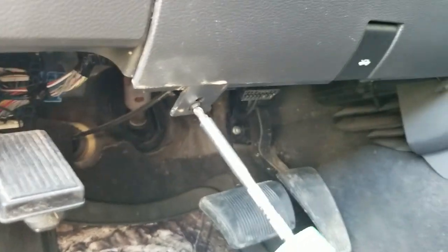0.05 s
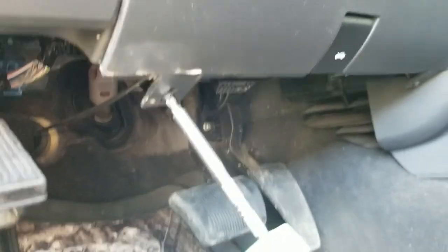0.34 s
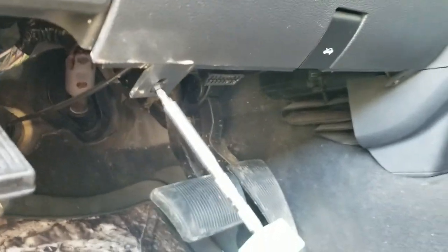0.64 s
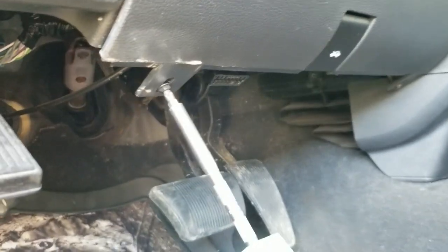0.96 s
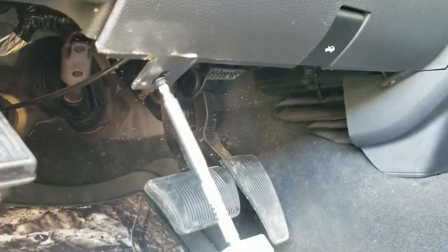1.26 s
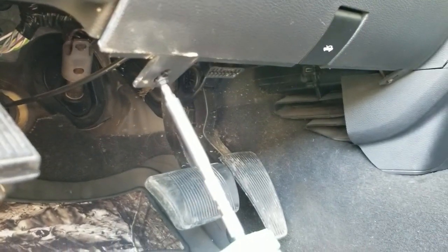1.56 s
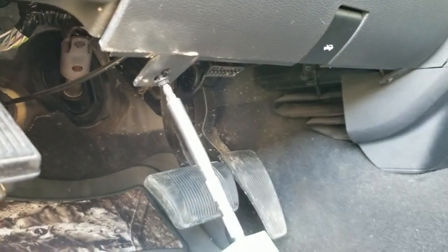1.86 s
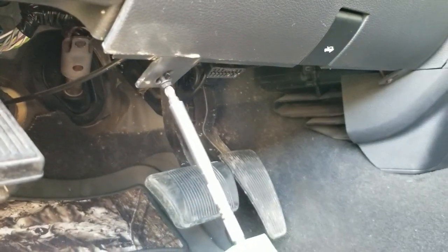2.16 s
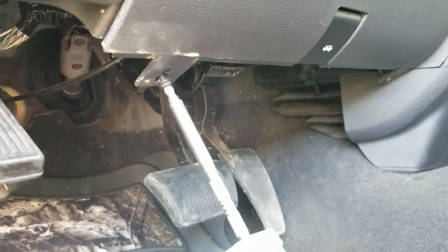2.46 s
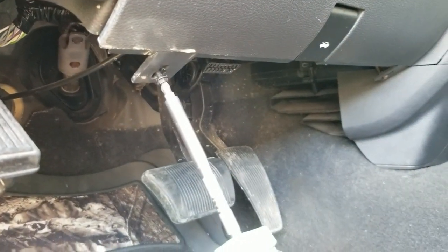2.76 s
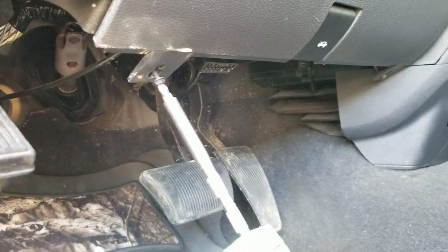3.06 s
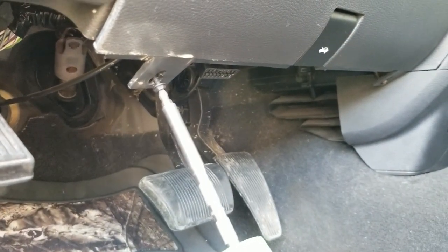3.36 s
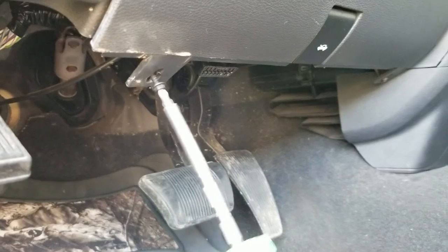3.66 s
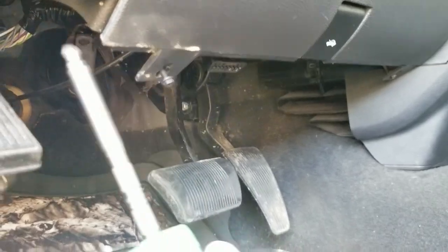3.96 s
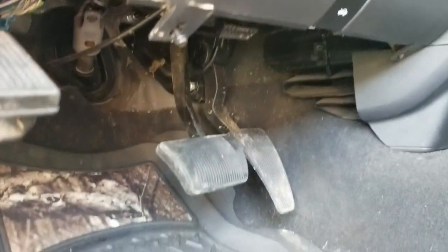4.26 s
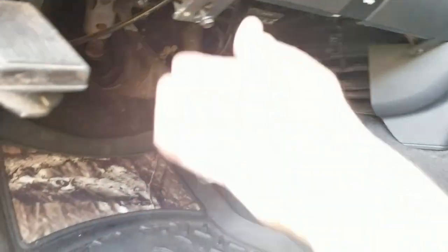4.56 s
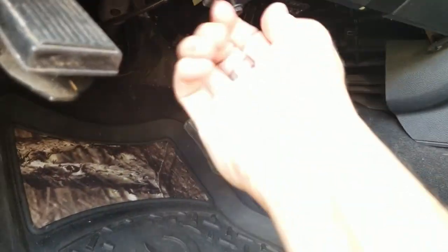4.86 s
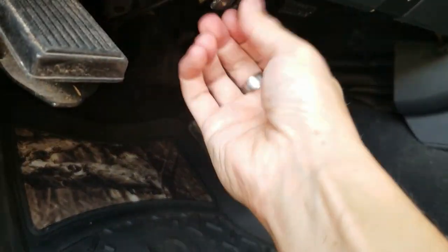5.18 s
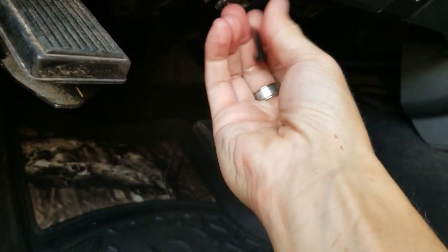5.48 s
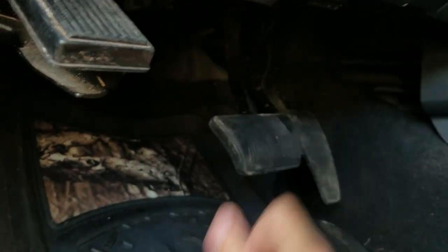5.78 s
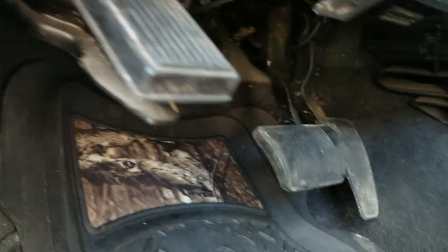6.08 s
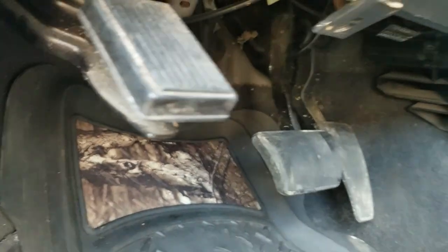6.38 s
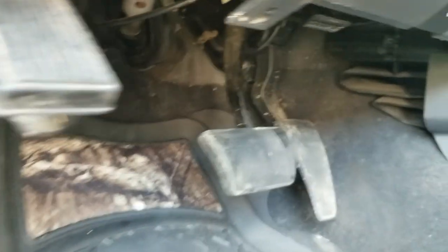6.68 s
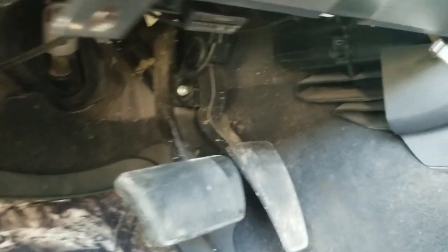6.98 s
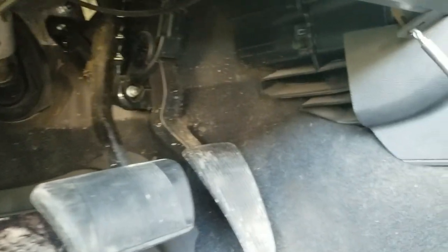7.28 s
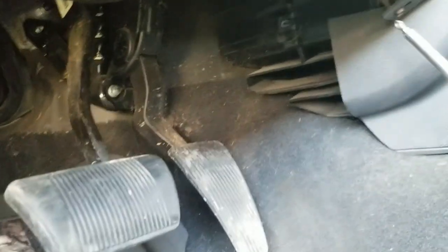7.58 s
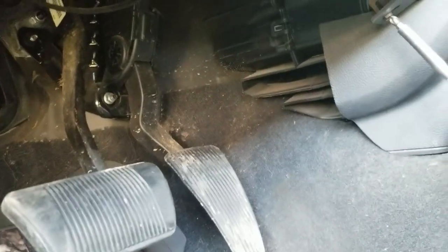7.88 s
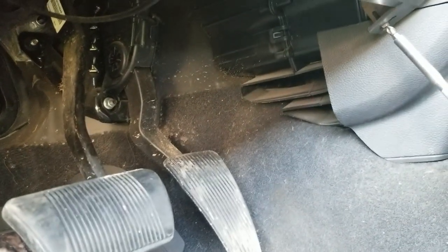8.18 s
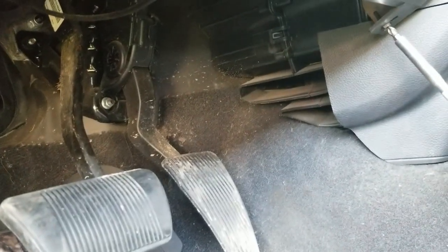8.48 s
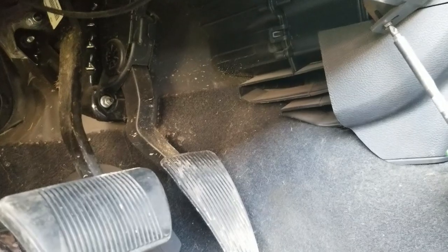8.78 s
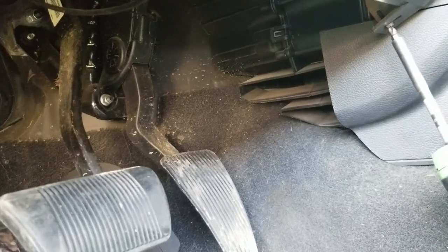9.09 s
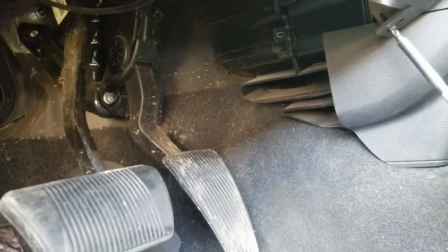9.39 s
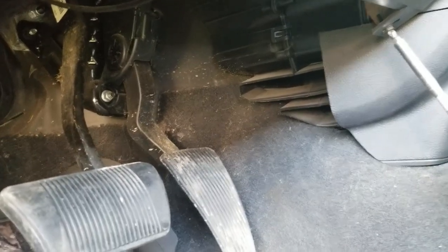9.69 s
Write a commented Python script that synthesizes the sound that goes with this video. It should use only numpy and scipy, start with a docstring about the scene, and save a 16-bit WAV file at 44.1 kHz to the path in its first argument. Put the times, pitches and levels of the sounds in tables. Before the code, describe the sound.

A small ratchet driver clicks and knocks against screws in a plastic car panel, with finger rubbing over a low hum.

```python
"""Ratchet driver in a car footwell

A small ratchet driver backs screws out of a plastic trim panel, close by, over a low cabin hum.
The pawl rattles over its teeth on each back-swing; the bit knocks and skitters on screw heads
and the panel thuds in its modes. Fingers rub as they spin the shaft; one freed screw pings."""
import sys
import numpy as np
from scipy import signal
from scipy.fft import rfft, irfft, next_fast_len
from scipy.io import wavfile
from scipy.ndimage import map_coordinates

SR = 44100
rng = np.random.default_rng(int(sys.argv[2]) if len(sys.argv) > 2 else 0)


def wav_record(signal):
    """Record a signal, one row per channel, as 16-bit PCM in the file named by sys.argv[1]."""
    frames = np.transpose(np.atleast_2d(signal))
    bounded = np.clip(frames, -1, 1)
    # unit amplitude maps onto the largest positive 16-bit level
    quanta = np.round(bounded * 32767).astype(np.int16)
    wavfile.write(sys.argv[1], SR, quanta)


N = 433944
RING_SAMPLES, TOP_HZ = 4096, 15900

# Level curves. Each row: time in seconds, level in dB.
HUM_CURVE_DB = [(0.0, -47), (0.87, -47), (1.31, -50), (3.23, -49.5), (4.85, -54), (7.48, -49.5),
                (7.97, -52.5), (9.21, -43.5), (9.84, -44)]
GRIP_CURVE_DB = [(0, -52), (1, -57), (1.3, -61), (2.3, -56.5), (2.6, -65.5), (3.25, -61.5), (3.72, -54.5),
                 (4.3, -62), (4.8, -58.5), (5, -66.5), (5.31, -53), (5.6, -71.5), (6.7, -63.5), (7, -54.5),
                 (7.2, -70), (8.2, -73), (9.35, -75), (9.84, -45.5)]
PALM_CURVE_DB = [(0, -52), (.57, -62.5), (.96, -54.5), (1.25, -64.5), (1.6, -58.5), (3.05, -60.5),
                 (3.45, -53.5), (3.75, -52), (4, -63), (4.5, -70.5), (6.3, -71), (6.52, -49.5), (6.82, -54),
                 (6.95, -63.5), (7.45, -55.5), (7.9, -74.5), (9.1, -66.5), (9.84, -55)]

# Spectra. Each row: frequency in Hz, level in dB.
HUM_SPECTRUM_DB = [(15, -71), (25, -37), (32, -29), (40, -12), (56, 2), (91, 1.5), (108, 0.5), (129, -6),
                   (162, -8), (221, -12.5), (281, -18), (335, -21), (379, -31), (500, -28), (650, -37),
                   (1100, -120)]
HISS_SPECTRUM_DB = [(300, -6), (1000, 1), (2800, -6), (5000, 5), (7000, 9.5), (9500, -2), (12500, -14),
                    (16000, -3)]
GRIP_SPECTRUM_DB = [(100, -22), (300, 8), (800, 12), (1500, 9), (3000, 3.5), (7000, 3), (9000, -18)]
SKIN_SPECTRUM_DB = [(300, -43), (2000, -17), (5000, -16), (7000, -1.5), (8800, -19), (10500, -8.5),
                    (12300, 0.5), (14000, -6), (16000, -13.5)]
BRUSH_SPECTRUM_DB = [(1470, -70), (2500, -38), (2640, -21), (3920, -8), (6250, 1.5), (9150, -16.5),
                     (12500, -9.5), (16000, -9)]
TRIM_SPECTRUM_DB = [(100, 5.5), (400, 4), (900, 5.5), (1300, 5), (2100, 3), (3200, 4), (5000, -1.5),
                    (6900, 8), (8700, -7), (11500, 11.5), (13000, 11.5), (16000, -4.5)]
RASP_SPECTRUM_DB = [(200, -11), (400, -3.5), (1200, -6), (1900, 2), (3000, -6.5), (6500, 2.5), (8500, -13),
                    (12000, -3.5), (16000, -16.5)]
CLICK_SPECTRUM_DB = [(150, -7.5), (400, -10.5), (1200, -13.5), (1900, -5), (3000, -5), (5000, 3), (6800, 9),
                     (8500, -6), (10000, -0.5), (11500, 10.5), (13000, 9.5), (16000, -1.5)]

# Modes. Each row: frequency in Hz, level in dB, T60 in seconds.
FLEX_MODES = [(58.6, -2, 0.21), (84, -6, 0.25), (103.5, 0.5, 0.34), (128, -4, 0.19), (166.3, -1, 0.19)]  # panel bending
SHELL_MODES = [(211, -0.5, 0.17), (266.4, -8.5, 0.25), (332.5, -4.5, 0.084), (388, -1.5, 0.11),
               (462.4, -2.5, 0.094), (700, -16, 0.1), (803, -5.5, 0.068), (1200, -13, 0.048)]  # panel as a hollow shell
BRACKET_MODES = [(932, -5, 0.059), (1233, -15, 0.15), (1740, -13, 0.098), (2154, -5.5, 0.062),
                 (2610, -0.5, 0.02), (3186, -35.5, 0.081), (3520, -1.5, 0.048), (4950, 3, 0.016),
                 (6586, -4.5, 0.049)]
SCREW_MODES = [(10680, -1, 0.028), (10870, -2, 0.039), (12020, -8, 0.039)]
# Steel ratchet head. Each row: frequency in Hz, level in dB.
HEAD_MODES = [(1830, -1.5), (2076, -10.5), (5517, -9), (6370, 3.5), (6741, 8), (7059, 9.5), (10930, 2),
              (11450, -2), (12810, -16)]

# Footwell decay. Each row: frequency in Hz, T60 in seconds.
FOOTWELL_T60_S = [(150, 0.19), (800, 0.063), (3000, 0.072), (7000, 0.048), (14000, .043)]
# Peaks and dips under the dash. Each row: centre in Hz, width in Hz, gain in dB.
CAVITY_BANDS = [(403.5, 235, 3), (560, 73, -3.5), (797, 156, 5), (923, 200, -3.5), (1516, 46, -2.5),
                (1924, 67, 2.5), (2000, 100, 2), (3490, 380, -5)]
# Stereo likeness. Each row: frequency in Hz, left-right correlation.
CORRELATION = [(100, .89), (400, .8), (900, .5), (2000, .1), (6000, 0)]
# Stereo balance. Each row: frequency in Hz, left minus right in dB.
BALANCE_DB = [(300, 0.5), (1000, 1), (2500, 4.5), (5000, 12), (7000, 16), (8800, 3), (12000, 17.5),
              (15500, 0.5)]

# Hand and arm brushing the trim. Each row: start in seconds, length in seconds, level in dB.
ARM_BRUSHES = [(4.55, 0.24, -61), (5.3, .13, -47.5), (6.32, 0.12, -53), (6.53, 0.19, -41), (6.97, .19, -41),
               (7.2, .3, -52.5)]
# Fingers spinning shaft or screw. Each row: start in seconds, length in seconds, strokes, level in dB.
FINGER_SPINS = [(.09, 0.098, 1, -49.5), (0.702, .1, 1, -41.5), (1.056, 0.16, 1, -51), (1.313, .2, 2, -48.5),
                (1.53, 0.32, 2, -48), (1.886, .28, 3, -50), (2.201, .4, 5, -48.5), (2.64, 0.2, 1, -50.5),
                (2.808, .08, 1, -46.5), (2.99, 0.073, 1, -47.5), (3.402, 0.1, 1, -47.5),
                (4.76, .21, 2, -59.5), (5.089, .21, 2, -53.5), (5.578, .18, 2, -55), (6.06, 0.086, 1, -56),
                (6.277, .13, 2, -53.5)]
# Panel excitation. Each row: start in seconds, level in dB.
PANEL_PUSHES = [(0.609, -32.5), (2.25, -38), (3.578, -34.5), (3.929, -32), (4.329, -34), (7.029, -27.5),
                (7.077, -31), (7.419, -30), (8.935, -31.5), (9.036, -25), (9.52, -33), (9.759, -35)]
TOOL_BUMPS = [(0.231, -39), (0.341, -39), (0.603, -35), (0.865, -37.5), (1.185, -44), (1.533, -44),
              (1.604, -38.5), (2.032, -35), (2.249, -39.5), (2.404, -33), (2.738, -44), (3.045, -36),
              (5.138, -41.5), (8.346, -41), (8.936, -21), (9.036, -24.5)]
# Bit, screw or hand on the trim. Each row: time in seconds, then level, hollow, clack and edge in dB.
TRIM_KNOCKS = [(1.058, -29, -4.5, -11, -17), (1.243, -38, -27, -20.5, -1), (1.689, -27, -16, -18.5, -8),
               (2.0317, -26, -24, -14.5, -9.5), (2.146, -31.5, -10.5, -12, -28),
               (2.3181, -26.5, -15, -12, -16), (2.4023, -21.5, -16, -15.5, -13),
               (3.0453, -37.5, 1, -3, -28), (3.4402, -35.5, -4, -5.5, -2), (3.693, -17, -40, -7, -24),
               (3.8128, -25, -18, -3, -7), (3.8531, -19.5, -40, -16, -5), (4.51, -38, 0.5, -7, -24),
               (4.82, -44.5, -4, -7, -18), (5.254, -45, 4, -6, -16), (5.3887, -19, -11, -6.5, -19),
               (5.8621, -12, -5.5, -15, -11), (5.9125, -30.5, 7.5, -6, -18.5), (6.3106, -42, 9, -28, -5),
               (6.4494, -25.5, -17, -16, -10), (6.4565, -13.5, -22, -29, -4), (6.5617, -22, -26, -22, -15),
               (7.004, -27.5, -23, -4, -18), (7.0285, -16.5, -6, -10, -6), (7.8128, -18, -10, -20, -18.5),
               (8.3492, -43.5, -1, -5, -10), (8.929, -5, -16, -14.5, -12.5),
               (8.992, -15.5, -22, -21.5, -26), (9.0371, -7.5, -15.5, -20, -8), (9.17, -29, -23, -19, -11),
               (9.407, -38, -0.5, -2.5, -13), (9.679, -30, -6, -1, -14)]
# Bit skittering on a screw head. Each row: start in seconds, contacts, gap in seconds,
# then first level, step per contact, hollow, clack and edge in dB.
BIT_RATTLES = [(.602, 2, 0.018, -17.5, -7, -8.5, -13, -4.5),
               (3.5699, 4, 0.017, -12.5, -4.5, -20, -9, -23.5), (3.897, 2, 0.027, -17, 0.5, -2, -4, -10.5),
               (4.3265, 4, 0.0091, -9, 1, -18.5, -22, -10.5), (4.416, 2, .0171, -20, 0.5, -14, -13.5, -10),
               (6.604, 3, 0.036, -10, -1.5, -30, -21, -23), (7.0352, 2, 0.037, -14.5, 0, -15.5, -12, -17),
               (9.506, 4, 0.011, -21, 1, -13, -15.5, -22), (9.772, 3, .021, -23.5, -2, -2, -6, -16)]
# Ratchet back-swings. Each row: start in seconds, length in seconds, teeth, slowing from 0 to 1,
# level in dB, fade over the swing in dB.
BACK_SWINGS = [(0.2668, 0.072, 3, .67, -13, 2.5), (.8925, .0995, 9, .5, -12.5, 5.5),
               (3.234, 0.11, 8, 0.01, -17.5, -2), (3.7004, 0.053, 5, 0.06, -16, 8),
               (4.0719, 0.014, 2, 0, -14.5, 9), (9.1955, .06, 5, 0.06, -13, 3),
               (9.2898, .046, 2, 0, -16, -0.5), (9.7615, 0.068, 5, 0.43, -14.5, 4)]


def amp(db):
    """Decibels to gain."""
    return np.exp(np.asarray(db) * np.log(10) / 20)


def unit_rms(x):
    """Scale to rms 1."""
    return x / np.sqrt(np.mean(x ** 2) + 1e-20)


def at_hz(points, hz):
    """(Hz, value) points read on a log axis."""
    knots_hz, values = np.transpose(points)
    return np.interp(np.log(hz + 1), np.log(knots_hz), values)


def curve(rows):
    """One value per sample from (s, value) rows."""
    return np.interp(np.arange(N) / SR, *np.transpose(rows))


def wobble(rate_hz):
    """Smooth random curve with knots at rate_hz."""
    knots = rng.standard_normal(int(N * rate_hz / SR) + 4)
    return map_coordinates(knots, [np.arange(N) * rate_hz / SR])


def add(track, start_s, sound):
    """Mix a sound into the track."""
    part = track[:, max(round(start_s * SR), 0):][:, :sound.shape[-1]]
    part += sound[..., :part.shape[1]]


def swells(rows):
    """Gain of rubs that swell and fade."""
    gain = np.zeros((1, N))
    for start_s, length_s, db in rows:
        add(gain, start_s, amp(db) * np.hanning(round(length_s * SR)))
    return gain


def filtered(x, response):
    """Zero-phase filter; response maps Hz to gain."""
    size = x.shape[-1]
    padded = next_fast_len(size + RING_SAMPLES)
    return irfft(rfft(x, padded) * response(np.fft.rfftfreq(padded, 1 / SR)), padded)[..., :size]


def min_phase(x, response_db):
    """Causal filter: nothing sounds before the blow."""
    cepstrum = irfft(np.log(amp(response_db(np.fft.rfftfreq(RING_SAMPLES, 1 / SR)))))
    cepstrum[1:RING_SAMPLES // 2] *= 2
    cepstrum[RING_SAMPLES // 2 + 1:] = 0
    impulse = irfft(np.exp(rfft(cepstrum)))
    return signal.fftconvolve(x, impulse[None], axes=1)[:, :x.shape[1]]


def stereo_noise(size):
    """White noise, alike left and right in the bass, unrelated in the treble."""
    angle = np.arccos(at_hz(CORRELATION, np.fft.rfftfreq(size, 1 / SR))) / 2
    mid, side = irfft(rfft(rng.standard_normal((2, size))) * [np.cos(angle), np.sin(angle)], size)
    return np.array([mid + side, mid - side])


def shaped_noise(spectrum_db):
    """Coloured stereo noise of rms 1."""
    white = stereo_noise(next_fast_len(N))[:, :N]
    return unit_rms(filtered(white, lambda hz: amp(at_hz(spectrum_db, hz))))


def ring(comb_gain=0.55):
    """One contact: dense footwell modes, treble dying first; a short random delay varies the colour."""
    hz, t, frames = signal.stft(stereo_noise(RING_SAMPLES), SR, nperseg=128)
    decay = amp(-60 * t / at_hz(FOOTWELL_T60_S, hz)[:, None])
    tail = signal.istft(frames * decay, SR, nperseg=128)[1][:, :RING_SAMPLES]
    lag = round(rng.uniform(0.0006, 0.0022) * SR)
    delayed = np.pad(tail, ((0, 0), (lag, 0)))[:, :RING_SAMPLES]
    return (tail + comb_gain * delayed) / np.hypot(1, comb_gain)


def modes(table, spread_db, detune, size=RING_SAMPLES):
    """Damped sines of an object, struck at new strengths each time."""
    t = np.arange(size) / SR
    out = np.zeros(size)
    for hz, db, t60_s in table:
        envelope = amp(db + rng.normal(0, spread_db) - 60 * t / t60_s)
        out += envelope * np.sin(2 * np.pi * (hz * rng.normal(1, detune) * t + rng.random()))
    return out


def cabin(hum_db=3, hiss_db=-64):
    """Low hum and a faint even hiss."""
    hum = amp(curve(HUM_CURVE_DB) + hum_db) * shaped_noise(HUM_SPECTRUM_DB)
    return hum + amp(hiss_db) * shaped_noise(HISS_SPECTRUM_DB)


def grip(ticks_per_s=11, tick_db=3, rustle_db=-6, flutter_db=4.5):
    """The tool creaks in the grip: tiny random ticks over an uneven rustle."""
    ticks = np.zeros((2, N))
    for position, chance in rng.random((int(ticks_per_s * N / SR), 2)):
        accent_db = min(-np.log(chance), 3)
        add(ticks, position * N / SR, amp(tick_db + accent_db) * ring())
    creak = min_phase(ticks, lambda hz: at_hz(GRIP_SPECTRUM_DB, hz))
    rustle = amp(rustle_db + flutter_db * wobble(16)) * shaped_noise(GRIP_SPECTRUM_DB)
    return amp(curve(GRIP_CURVE_DB)) * (creak + rustle)


def finger_strokes(scatter_db=2.5):
    """(start s, length s, dB) of each stroke, uneven in pressure."""
    return [(start_s + k * length_s / count, length_s / count, db + rng.normal(0, scatter_db))
            for start_s, length_s, count, db in FINGER_SPINS for k in range(count)]


def rubbing(strokes, stroke_db=1):
    """Fingers slide on the shaft, the palm rubs the handle, the arm brushes the trim."""
    skin_gain = np.hypot(amp(curve(PALM_CURVE_DB)), amp(stroke_db) * swells(strokes))
    grain = amp(1.8 * wobble(500) + 1.2 * wobble(70))  # skin ridges catch and slip
    skin = skin_gain * shaped_noise(SKIN_SPECTRUM_DB)
    arm = swells(ARM_BRUSHES) * shaped_noise(BRUSH_SPECTRUM_DB)
    return grain * (skin + arm)


def panel(events, table, level_db, attack_s):
    """A soft push sets the plastic swinging in its modes."""
    out, size = np.zeros((2, N)), 2 * RING_SAMPLES
    onset = 1 - np.exp(-np.arange(size) / SR / attack_s)
    for start_s, db in events:
        add(out, start_s, amp(db + level_db) * onset * modes(table, spread_db=2.5, detune=0.028, size=size))
    return out


def screw_drop(start_s=5.551, ping_db=-22, tick_db=-32):
    """The freed screw drops into the hand with one thin, high ping."""
    out = np.zeros((2, N))
    tick = min_phase(ring(), lambda hz: at_hz(CLICK_SPECTRUM_DB, hz))
    ping = modes(SCREW_MODES, spread_db=3, detune=0)
    add(out, start_s, amp(ping_db) * ping + amp(tick_db) * tick)
    return out


def contacts():
    """Single knocks, plus each rattle as an even run of knocks."""
    rattles = [(start_s + k * gap_s, db + k * step_db, *colour_db)
               for start_s, count, gap_s, db, step_db, *colour_db in BIT_RATTLES for k in range(count)]
    return list(TRIM_KNOCKS) + rattles


def knocks(level_db=-6, bracket_db=-11, crack_db=-1, graze_db=-22, graze_s=0.006):
    """The tool grazes, then lands with a crack: hollow if blunt, hard-edged if metal meets metal."""
    out = np.zeros((2, N))
    crack = 1 + amp(crack_db) * np.exp(-np.arange(RING_SAMPLES) / SR / 0.00086)
    for time_s, db, hollow_db, clack_db, edge_db in contacts():
        colour_db = [(500, hollow_db + 2), (900, hollow_db + 5), (1600, clack_db + 8),
                     (2800, clack_db + 8), (4500, 0.0031), (7500, 0.0009), (10500, edge_db)]
        bracket = np.array([modes(BRACKET_MODES, spread_db=3.5, detune=0.0238) for side in "LR"])
        blow = amp(graze_db) * ring()
        add(blow, graze_s, crack * ring() + amp(bracket_db) * bracket)
        knock = min_phase(blow, lambda hz: at_hz(TRIM_SPECTRUM_DB, hz) + at_hz(colour_db, hz))
        add(out, time_s - graze_s, amp(db + level_db) * knock)
    return out


def pawl_rasp(level_db=-17, ref_teeth_per_s=80, rough_db=3, overrun_s=0.012):
    """The pawl drags over the wheel; amplitude grows with the square of the speed."""
    rubs = []
    for start_s, length_s, count, _, db, _ in BACK_SWINGS:
        speed = (count - 1) / length_s / ref_teeth_per_s
        rubs.append((start_s, length_s + overrun_s, db + 40 * np.log10(speed)))
    return swells(rubs) * amp(level_db + rough_db * wobble(600)) * shaped_noise(RASP_SPECTRUM_DB)


def teeth(scatter_db=1):
    """(s, dB) of each pawl snap; the gaps widen as a swing slows."""
    return [(start_s + length_s * u * (1 - slowing * (1 - u)), db - fade_db * u + rng.normal(0, scatter_db))
            for start_s, length_s, count, slowing, db, fade_db in BACK_SWINGS
            for u in np.linspace(0, 1, count)]


def ratchet(level_db=-2, steel_db=-16, steel_t60_s=0.053, share=0.55, slide_db=-25, slide_s=0.0051):
    """The pawl slides up a tooth and snaps onto the steel head; all clicks share part of their ring."""
    clicks, tones = np.zeros((2, N)), np.zeros((2, N))
    t = np.arange(RING_SAMPLES) / SR
    onset = 1 - np.exp(-t / 0.00076)
    shared_ring = ring()
    for time_s, db in teeth():
        add(clicks, time_s - slide_s, amp(db + slide_db) * ring())
        snap = np.sqrt(share) * shared_ring + np.sqrt(1 - share) * ring()
        add(clicks, time_s, amp(db) * onset * snap)
        steel = sum(amp(mode_db + rng.normal(0, 3)) * np.sin(2 * np.pi * (hz * t + rng.random((2, 1))))
                    for hz, mode_db in HEAD_MODES)
        add(tones, time_s, onset * steel * amp(db + steel_db - 60 * t / steel_t60_s))
    return amp(level_db) * (min_phase(clicks, lambda hz: at_hz(CLICK_SPECTRUM_DB, hz)) + tones)


def cavity_db(hz):
    """Resonant colour of the space under the dash."""
    return sum(db / (1 + (2 * (hz - centre_hz) / width_hz) ** 2)
               for centre_hz, width_hz, db in CAVITY_BANDS)


def balance(hz):
    """Constant-power gains: the left channel is brighter, with peaks near 7 and 12 kHz."""
    gains = np.array([np.ones_like(hz), amp(-at_hz(BALANCE_DB, hz))])
    return gains / np.sqrt(np.mean(gains ** 2, axis=0))


def scene():
    """Tool under the dash, panel, hand and cabin; each finger stroke nudges the panel."""
    tool = min_phase(ratchet() + pawl_rasp() + knocks() + screw_drop() + grip(), cavity_db)
    strokes = finger_strokes()
    thuds = panel(PANEL_PUSHES, FLEX_MODES, level_db=-1, attack_s=0.0023)
    bumps = panel(TOOL_BUMPS, SHELL_MODES, level_db=-6.5, attack_s=0.00048)
    mid_strokes = [(start_s + length_s / 2, db) for start_s, length_s, db in strokes]
    nudges = panel(mid_strokes, SHELL_MODES, level_db=-9, attack_s=0.0011)
    return filtered(tool + thuds + bumps + nudges + rubbing(strokes) + cabin(), balance)


def record(dry):
    """Soft limit on the highest peaks, then a steep low-pass."""
    rounded = dry / (1 + (dry / 0.95) ** 8) ** (1 / 8)
    return filtered(rounded, lambda hz: 1 / np.sqrt(1 + (hz / TOP_HZ) ** 160))


dry = scene()
out = record(dry)
wav_record(out)
```